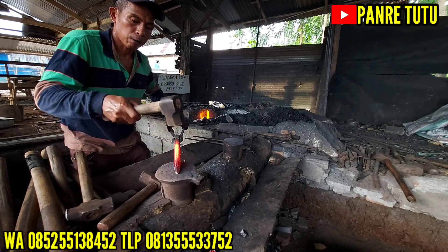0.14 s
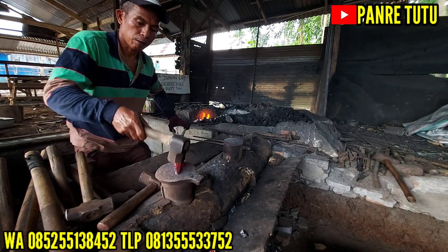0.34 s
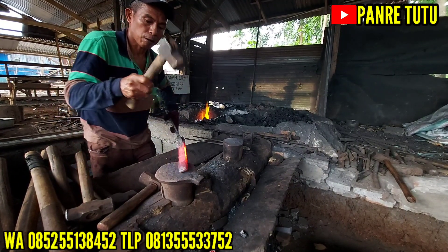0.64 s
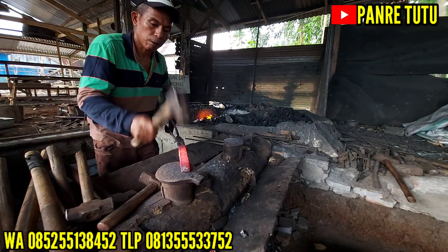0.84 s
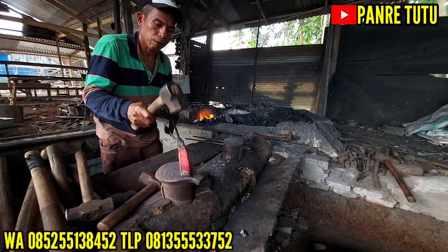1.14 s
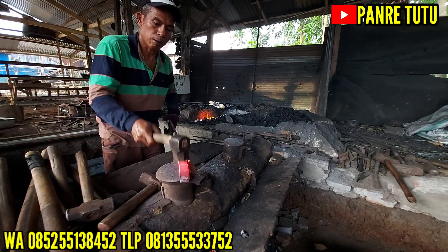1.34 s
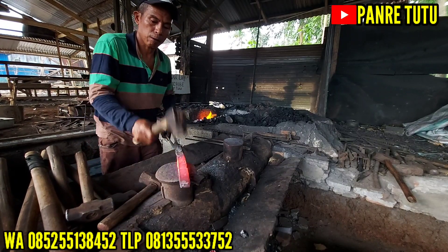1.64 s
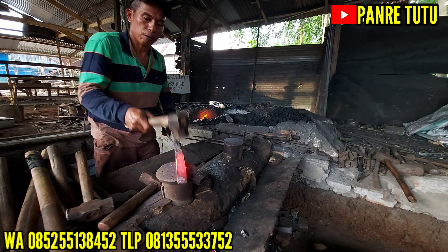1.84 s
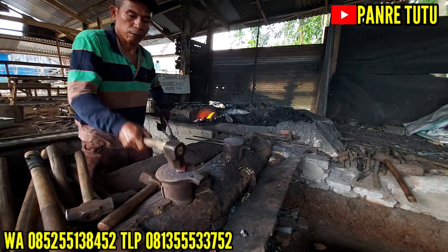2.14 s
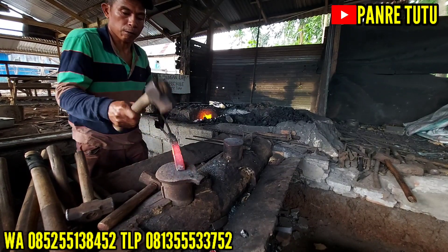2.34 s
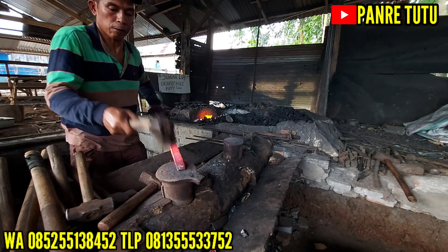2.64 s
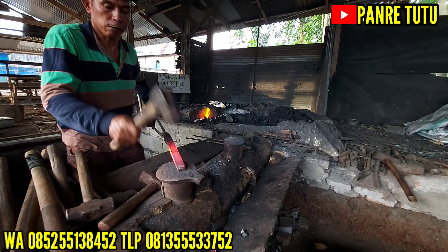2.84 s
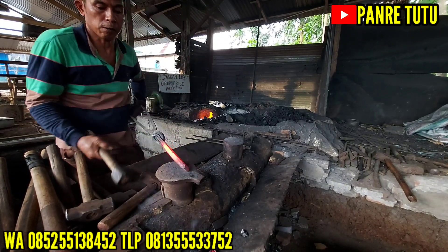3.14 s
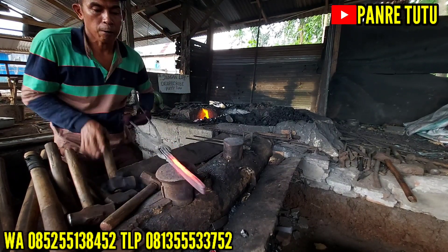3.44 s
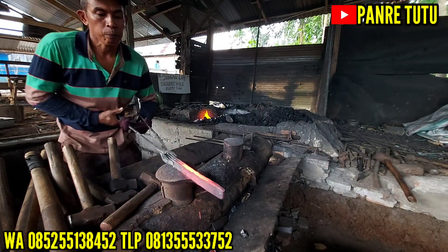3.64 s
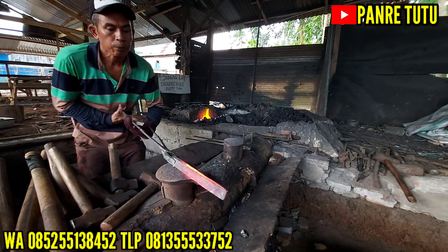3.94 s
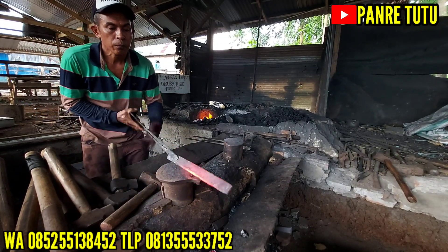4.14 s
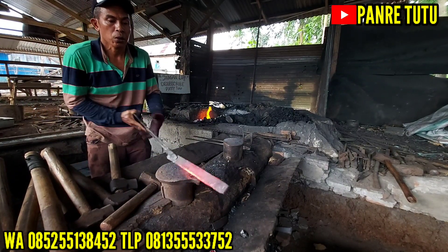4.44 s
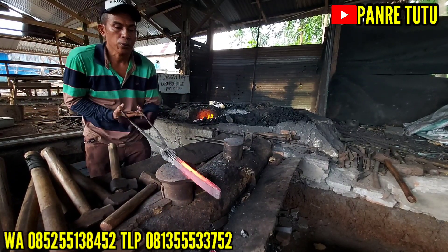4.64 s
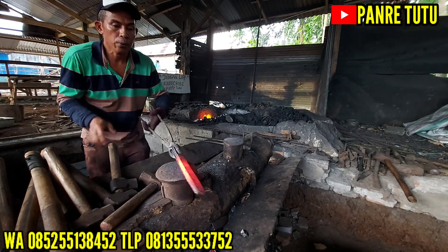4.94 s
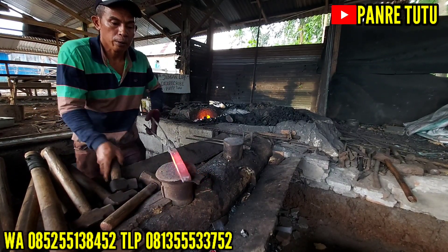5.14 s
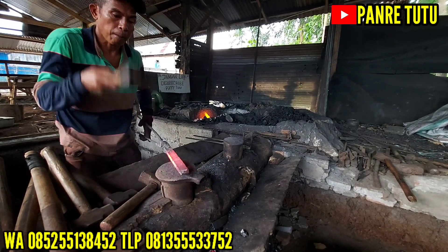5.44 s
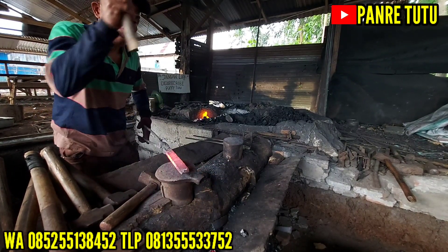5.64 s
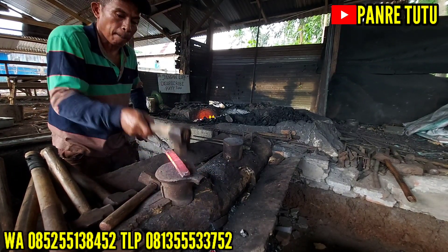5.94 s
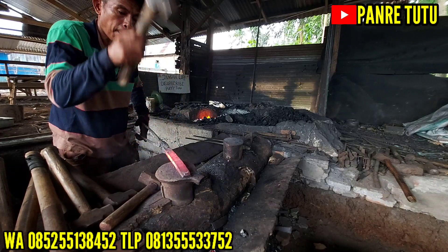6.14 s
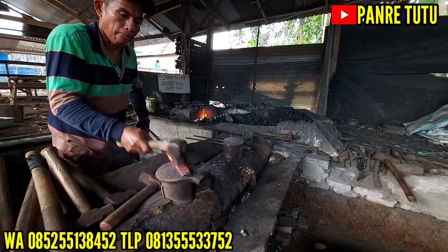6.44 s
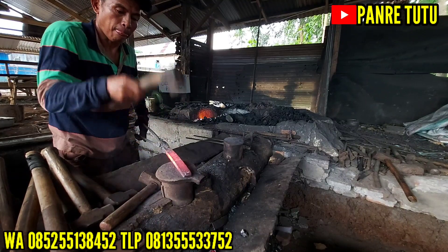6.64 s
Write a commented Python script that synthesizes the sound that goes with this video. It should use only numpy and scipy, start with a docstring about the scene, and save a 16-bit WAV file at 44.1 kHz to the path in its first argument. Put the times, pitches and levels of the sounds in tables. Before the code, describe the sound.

Close, single-channel sound in an open forge with a short, scattered roof reflection. Very faint air and low rumble lie underneath. At 0.4 s a light tap lands, then firm blows at 1.0, 1.4, 1.8, 2.2, 2.6 and 3.0 s: bright noisy steel cracks with a dull log thud and brief, damped ring. Faint hiss and tiny scale snaps sit between them, the hiss swelling near 2.0 s. At 3.3-3.45 s a dropped hammer clacks in a quick cluster among tools, followed by weaker knocks around 3.65 s and tiny settling touches until about 4.6 s. A low wavering blower hum grows. Around 5.1-5.4 s, a short sizzle swells, flakes snap and wooden handles scrape softly. The hum peaks near 5.5 s, then slowly sinks. Two harder, clearer-ringing blows strike at 5.96 and 6.54 s, their tails dying quickly before the end.

```python
"""Hammering hot iron in an open forge

A smith strikes a red-hot billet on a stake anvil set in a log, under a low roof. Each blow is a noisy
steel crack, a thud of log modes and a short ring of steel modes. Midway the hammer is dropped among other
tools, which knock and scrape, and a second one is taken up. Scale flakes snap and the iron hisses in
swelling noise, over the wavering tones of a blower, a low rumble and a faint wash of air."""
import sys
import numpy as np
from scipy import signal
from scipy.fft import rfft, irfft, next_fast_len
from scipy.io import wavfile

SR = 44100
rng = np.random.default_rng(int(sys.argv[2]) if len(sys.argv) > 2 else 0)


def digitize_waveform(pressure):
    """Quantize a signal to 16-bit integers and store it at the path in sys.argv[1].

    Rows of a 2-D input are taken as channels; values are limited to [-1, 1].
    """
    field = np.atleast_2d(pressure).T
    bounded = np.clip(field, -1, 1)
    quanta = np.round(bounded * 32767).astype(np.int16)
    wavfile.write(sys.argv[1], SR, quanta)


N = 299880
TIME = np.arange(N) / SR            # seconds into the scene
AGE = np.arange(int(0.6 * SR)) / SR  # seconds since the start of one hit
ATTACK = AGE < 0.08

# Bright crack of struck steel. Each row: frequency in Hz, relative level in dB per Hz.
CRACK_SPECTRUM = [(1200, -15), (2400, -3.5), (3400, -2), (4600, 0.5), (6800, -1.5), (8400, 2), (9900, -6.5),
                  (12000, 0), (15500, -11)]
# Colour of hot iron's hiss and of its snapping flakes. Each row: frequency in Hz, relative level in dB per Hz.
HISS_SPECTRUM = [(1470, -20), (2500, -16), (3520, -15.5), (5920, -5.5), (6900, -9.5), (8610, -5.5),
                 (9880, -17.5), (11500, -10.5), (15500, -14)]
# The wood's dull answer to a push or a rub. Each row: frequency in Hz, relative level in dB per Hz.
THUD_SPECTRUM = [(65, -3), (110, -7.5), (150, -1), (210, -3.5), (310, 2), (480, -1), (660, -5.5),
                 (770, -19.5), (1200, -27.5)]


def from_db(db):
    """Turns dB into an amplitude factor."""
    return 10 ** (np.asarray(db) / 20)


def rms_one(x):
    """Scales a sound to rms 1."""
    return x / np.sqrt(np.mean(x ** 2) + 1e-20)


def hit_one(x):
    """Scales a hit to rms 1 over its first 80 ms."""
    return x / np.sqrt(np.mean(x[ATTACK] ** 2) + 1e-20)


def at_hz(points, hz):
    """Reads a curve between its points, along a logarithmic frequency axis."""
    known_hz, values = np.transpose(points)
    return np.interp(np.log(hz), np.log(known_hz), values)


def add(track, s, sound):
    """Mixes a sound in at time s."""
    start = max(0, round(s * SR))
    track[start:start + len(sound)] += sound[:max(0, N - start)]


def band(x, low_hz, high_hz, order=2):
    """Band-pass filter."""
    sos = signal.butter(order, [low_hz, min(high_hz, 0.45 * SR)], "band", fs=SR, output="sos")
    return signal.sosfilt(sos, x)


def colour(x, spectrum):
    """Causal (minimum-phase) filter with the given spectrum, falling 20 dB per octave beyond its ends."""
    size = 2 * next_fast_len(len(x))
    hz = np.maximum(np.arange(size // 2 + 1) * SR / size, 1)
    octaves_below = np.maximum(np.log2(spectrum[0][0] / hz), 0)
    octaves_above = np.maximum(np.log2(hz / spectrum[-1][0]), 0)
    gain = from_db(at_hz(spectrum, hz) - 20 * (octaves_below + octaves_above))
    # folding the cepstrum onto positive time gives the minimum phase
    cepstrum = irfft(np.log(gain))
    cepstrum[1:size // 2] *= 2
    cepstrum[size // 2 + 1:] = 0
    return irfft(rfft(x, size) * np.exp(rfft(cepstrum)))[:len(x)]


def drift(rate):
    """Random wander of rms 1, with so many turning points per second."""
    knots = rng.standard_normal(2000)
    return rms_one(np.interp(TIME * rate, np.arange(len(knots)), knots))


def fade(t60):
    """Exponential decay that loses 60 dB in t60 seconds."""
    return from_db(-60 * AGE / t60)


def mode(hz, t60):
    """One damped resonance: a dying sine."""
    return np.sin(2 * np.pi * hz * AGE) * fade(t60)


def burst(t60):
    """Dense tiny contacts that die away."""
    return rng.standard_normal(len(AGE)) * fade(t60)


def forge_tail(roof_s=0.012, early_db=-8):
    """Nearby clutter scatters a little; the bulk returns from the roof and dies band by band. Energy 1."""
    # Ring time under the roof. Each row: frequency in Hz, t60 in seconds.
    roof_t60 = [(67, 0.42), (350, 0.31), (1700, 0.28), (5600, 0.24), (12700, .21)]
    edges = [30, 150, 800, 3500, 9000, 18000]  # Hz
    hz = np.arange(len(AGE) // 2 + 1) * SR / len(AGE)
    white = np.exp(2j * np.pi * rng.random(len(hz)))
    tail = np.zeros(len(AGE))
    for low, high in zip(edges, edges[1:]):
        slice_noise = irfft(white * (hz >= low) * (hz < high), len(AGE))
        tail += slice_noise * fade(at_hz(roof_t60, np.sqrt(low * high)))
    tail = tail * np.where(AGE < roof_s, from_db(early_db), 1)
    return tail / np.linalg.norm(tail)


def in_forge(x, wet_db):
    """A ringing sound together with its scattered reflections."""
    reflections = signal.fftconvolve(x, forge_tail())[:len(AGE)]
    return hit_one(hit_one(x) + from_db(wet_db) * hit_one(reflections))


def impact(force, spectrum, wet_db, echo_db):
    """A brief force, its near reflections and the scattered tail, all in the colour of the struck body."""
    # Near reflections from the floor and the smith. Each row: delay in seconds, relative gain.
    near_echoes = [(.0063, 0.31), (0.0125, 0.4)]
    direct = force / np.linalg.norm(force)
    near = sum(gain * np.roll(direct, round(delay * SR)) for delay, gain in near_echoes)
    tail = from_db(wet_db) * forge_tail()
    return hit_one(colour(direct + from_db(echo_db) * near + tail, spectrum))


def hammering():
    """Every blow: the scale cracks, the billet clanks, the steel rings, and log and ground take the weight."""
    # Hammer blows. Each row: start in seconds, force in dB, contact t60 in seconds, top of the crack in dB,
    # thump in Hz, thump level in dB, steel ring in dB, ring tilt to the treble in dB.
    blows = [(0.397, -8.5, 0.011, -6, 188, -28, -63, 8), (0.99, 1.5, 0.014, 0.5, 78, -36.5, -45.5, 3.5),
             (1.411, 0.1, 0.021, -2, 73, -40, -47, -0.5), (1.8112, -1, 0.024, -2, 76, -36, -61, 0),
             (2.219, 0, 0.0025, 1, 58, -31, -46.5, -8), (2.6219, 0.4, 0.0072, -4.5, 118, -30, -50.5, 1),
             (3.021, -0.6, 0.0093, 2, 84, -21.5, -46.5, 8.5), (5.963, 4, 0.017, 3, 60, -35, -29, -0.1),
             (6.541, 2.66, .0085, 1, 58, -25, -32.5, 2)]
    # Clank of the billet. Each row: frequency in Hz, relative level in dB per Hz.
    clank_spectrum = [(500, 9.5), (750, 13.5), (1100, 15), (1600, 12), (2500, 9), (3300, -24), (5000, -7.5),
                      (8000, -50)]
    out = np.zeros(N)
    for s, force_db, contact_s, top_db, thump_hz, thump_db, ring_db, tilt_db in blows:
        # the second hammer drives the log less and stirs up more tail
        second = s > 5.2
        # direct crack over its scattered tail: a bright, off-centre blow sounds drier
        snap_db = 3.5 + 0.2 * tilt_db - 4 * second

        # the parts of a blow grow with its force, each at its own pace
        crack_db = -35 + 1.1 * force_db
        clank_db = -36 + 2 * force_db
        thud_db = -22.5 + force_db - 2 * second

        # soft iron gives way, so the force takes a moment to peak
        force = burst(contact_s) * np.clip(8 * AGE / contact_s, 0, 1)
        spectrum = [(hz, db + top_db * (hz > 9500)) for hz, db in CRACK_SPECTRUM]
        crack = from_db(crack_db) * impact(force, spectrum, wet_db=-snap_db, echo_db=-13)
        clank = from_db(clank_db) * impact(burst(t60=0.0046), clank_spectrum, wet_db=6, echo_db=-10)

        # the middle cluster stands above its neighbours; a bright blow chokes the ring into clang
        cluster_db = [ring_db - tilt_db, ring_db + 2.5, ring_db + tilt_db]
        ring = steel_ring(cluster_db, clang_db=2 + 1.6 * tilt_db, snap_db=snap_db)
        wood = from_db(thud_db) * log_thud() + from_db(thump_db) * ground_thump(thump_hz)
        add(out, s, crack + clank + ring + wood)
    return out


def steel_ring(levels_db, clang_db, snap_db, spread_db=-0.84):
    """Three clusters of free steel modes, each with a quickly damped clang at its own level."""
    # Steel modes of hammer and anvil. Each row: frequency in Hz, relative level in dB, t60 in seconds.
    steel_modes = [(2688, -6, 0.36), (2766, -10, 0.25), (2964, -18.5, 0.17), (4160, -2, .18),
                   (4360, 4, 0.12), (4313, -5.5, 0.18), (4745, -6.5, 0.21), (8075, -22.5, 0.12),
                   (9000, -13, 0.076), (8470, 1, 0.14), (9107, -16.5, .2)]
    # Borders between the three clusters, in Hz.
    splits_hz = [3500, 6000]
    # Damped clang around each cluster. Each row: frequency in Hz, bandwidth in Hz.
    clang_modes = [(2760, 140), (4420, 240), (8420, 420)]
    clusters = np.zeros((3, len(AGE)))
    for hz, db, t60 in steel_modes:
        varied_db = db + spread_db * rng.standard_normal()
        clusters[np.searchsorted(splits_hz, hz)] += from_db(varied_db) * mode(hz, t60)
    out = np.zeros(len(AGE))
    for db, cluster, (hz, width_hz) in zip(levels_db, clusters, clang_modes):
        clang_t60 = np.log(1000) / (np.pi * width_hz)
        clang = in_forge(mode(hz, clang_t60), wet_db=2.5 - snap_db)
        free_ring = in_forge(cluster, wet_db=-10)
        out += from_db(db) * hit_one(free_ring + from_db(clang_db) * clang)
    return out


def log_thud(ring_db=-6, ring_t60=0.25, spread_db=0.5, swell_s=0.0047):
    """The log takes one short push and its modes ring on, a little differently at each blow."""
    # Modes of the log with the anvil in it. Each row: frequency in Hz, relative level in dB.
    log_modes = [(149, 5), (226, -3.5), (262, -0.5), (318, 5.5), (342, 2.5), (378, -4.5), (409, -33.5),
                 (456, 2.5), (474, 5), (521, -16), (556, -9.5), (591, 0.5), (612, -17), (665, 2.5),
                 (799, -39), (816, -25), (939, -13), (1105, -5.5), (1128, -18.5), (1147, -12.5),
                 (1346, -42.5), (1370, -21)]
    push = impact(np.where(AGE == 0, -1, 0), THUD_SPECTRUM, wet_db=-4, echo_db=2)
    rings = np.zeros(len(AGE))
    for hz, db in log_modes:
        varied_db = db + spread_db * rng.standard_normal()
        rings += from_db(varied_db) * rng.choice([-1, 1]) * mode(hz, ring_t60)
    swelling_rings = rings * (1 - np.exp(-AGE / swell_s))
    return hit_one(push + from_db(ring_db) * hit_one(swelling_rings))


def ground_thump(hz, cycles=4.7):
    """The log bounces on the earth floor: a low mode that loses 60 dB within a few cycles."""
    bounce = band(mode(hz, cycles / hz), 42, 490)
    return in_forge(band(bounce, 36, 970), wet_db=-15.5)


def tool_clatter(count=5, touch_hz=900, touch_spread=0.15, tool_db=-15):
    """Hammer heads and wooden handles tumble against the log, then settle."""
    # Tools knocking on the log and on each other.
    # Each row: start in seconds, log thud in dB, tool level in dB, tool note in Hz.
    tool_knocks = [(.001, -40, -47, 647), (3.295, -19.5, -34.5, 669), (3.307, -25, -29.5, 1246),
                   (3.3635, -24.5, -33.5, 944), (3.384, -36, -39.5, 810), (3.397, -35, -40, 1330),
                   (3.433, -37.5, -42, 1014), (3.614, -31.5, -46.5, 597), (3.623, -40, -53, 1023),
                   (3.666, -40.5, -50, 630), (3.746, -65, -53, 964), (3.846, -66, -66, 966),
                   (3.875, -49, -63, 595), (3.989, -57, -72.5, 840), (4.102, -70, -47.5, 813),
                   (4.123, -44.5, -55, 859), (4.589, -68, -80, 593)]
    out = np.zeros(N)
    for s, *contact in tool_knocks:
        add(out, s, knock(*contact))

    # the dropped hammer rocks itself to rest with light random touches, ever weaker
    settle_start_s, settle_length_s = 3.64, 0.52
    settle_db, settle_db_per_s = -52, -8.5
    for k, (late, pitch) in enumerate(rng.random((count, 2))):
        age = settle_length_s * (k + late) / count
        db = settle_db + settle_db_per_s * age
        note_hz = touch_hz * (1 + touch_spread * (2 * pitch - 1))
        add(out, settle_start_s + age, knock(db, db + tool_db, note_hz))
    return out


def knock(thud_db, tool_db, note_hz, note_t60=0.055, overtone=2.25, overtone_db=-13):
    """A tool meets the log and rings briefly with its own note; the firmer the knock, the more it clacks."""
    # Clack of tool on wood. Each row: frequency in Hz, relative level in dB per Hz.
    clack_spectrum = [(200, -9), (400, -1.5), (850, 3), (1400, 1.5), (2200, -6), (2900, -11), (4000, -17),
                      (8000, -30.5)]
    firmness_db = tool_db + 36  # 0 for a firm knock
    clack_db = -36.5 + 1.71 * firmness_db
    tick_db = -65 + 0.53 * firmness_db
    clack = from_db(clack_db) * impact(rattle(t60=0.075), clack_spectrum, wet_db=3, echo_db=0.5)
    tick = from_db(tick_db) * impact(burst(t60=0.02), CRACK_SPECTRUM, wet_db=2.5, echo_db=-11.5)
    upper = from_db(overtone_db) * mode(overtone * note_hz, note_t60)
    note = in_forge(mode(note_hz, note_t60) + upper, wet_db=-7.5)
    thud = log_thud() + from_db(-8.5) * ground_thump(hz=155)
    return from_db(thud_db) * thud + clack + tick + from_db(tool_db) * note


def rattle(t60, per_s=220, first=2.3):
    """One firm contact followed by separate, dying chatters."""
    chatter = (rng.random(len(AGE)) < per_s / SR) * burst(t60)
    return chatter + first * (AGE == 0)


def scrapes(swell_s=0.039, t60=0.09, note_db=-3):
    """Wood rubs on wood: friction swells softly and stirs the handle's note."""
    # Handles sliding over each other as one is picked up. Each row: start in seconds, level in dB, note in Hz.
    rubs = [(5.173, -52, 417), (5.24, -40.5, 790), (5.314, -46, 705)]
    out = np.zeros(N)
    for s, db, hz in rubs:
        friction = burst(t60) * np.clip(AGE / swell_s, 0, 1)
        note = hit_one(band(friction, 0.61 * hz, 0.99 * hz))
        rub = hit_one(colour(friction, THUD_SPECTRUM))
        add(out, s, from_db(db) * in_forge(rub + from_db(note_db) * note, wet_db=-8))
    return out


def flakes():
    """Flakes of scale snap off the iron: small bright bursts in the colour of the hiss."""
    # Snapping flakes. Each row: start in seconds, level in dB.
    snaps = [(0.841, -63), (1.561, -64.5), (5.113, -71), (5.139, -57.5), (5.756, -78), (6.216, -74)]
    out = np.zeros(N)
    for s, db in snaps:
        add(out, s, from_db(db) * impact(burst(t60=0.032), HISS_SPECTRUM, wet_db=-1, echo_db=-5))
    return out


def sizzle(spits_per_s=500, spit_db=-6, flutter_db=1.55):
    """Smooth hiss with tiny spits in it; each spell swells and sinks in one arch."""
    # Spells of hiss while the hot iron lies against the anvil.
    # Each row: start in seconds, length in seconds, level in dB.
    spells = [(0.587, 0.47, -72.5), (0.845, 0.95, -62.5), (1.78, 0.47, -55.5), (4.92, 0.2, -64.5),
              (5.089, .31, -46.5), (5.38, 0.8, -66.5)]
    steepness, smoothing_s, rest_db = 1.2, 0.02, -88.5
    level = np.full(N, from_db(rest_db))
    for s, length_s, db in spells:
        progress = np.clip((TIME - s) / length_s, 0, 1)
        level += from_db(db) * np.abs(np.sin(np.pi * progress)) ** steepness
    keep = np.exp(-1 / (smoothing_s * SR))
    level = signal.lfilter([1 - keep], [1, -keep], level)
    spits = (rng.random(N) < spits_per_s / SR) * rng.standard_normal(N)
    hiss = rng.standard_normal(N) + from_db(spit_db) * rms_one(spits)
    flutter = from_db(flutter_db * drift(60))
    return level * flutter * rms_one(colour(hiss, HISS_SPECTRUM))


def blower(waver=0.21, throb_db=4.5):
    """Wavering motor tones over a low rush of air; both rise as the blower runs up once and coasts down."""
    # Blower tones. Each row: frequency in Hz, relative level in dB.
    motor_tones = [(107.7, -12), (144.5, 1), (344.5, -27), (457.6, -26.5)]
    # Low rumble of moving air. Each row: frequency in Hz, relative level in dB per Hz.
    rumble_spectrum = [(25, -29), (45, -6), (68, 2), (110, -1), (145, 1.5), (200, -6.5), (300, -13),
                       (450, -22.5), (600, -28), (800, -40.5), (1200, -39)]
    idle_db, peak_db, peak_s = -69, -42, 5.47
    run_up_db_per_s, coast_db_per_s = 16, 7
    draught_db, rush_db = -56.5, -8  # steady draught of the forge; air the blower adds, against its hum

    run_up_db = run_up_db_per_s * (peak_s - TIME)
    coast_db = coast_db_per_s * (TIME - peak_s)
    below_peak_db = np.maximum(run_up_db, coast_db)
    effort = np.hypot(from_db(idle_db), from_db(peak_db - below_peak_db))

    hum = np.zeros(N)
    for hz, db in motor_tones:
        throb = from_db(db + throb_db * drift(9))
        hum += throb * np.sin(2 * np.pi * hz * TIME + waver * drift(3.1))  # waver in radians
    rumble = colour(rng.standard_normal(N), rumble_spectrum)
    rumble_level = np.hypot(from_db(draught_db), from_db(rush_db) * effort)
    return effort * rms_one(hum) + rumble_level * rms_one(rumble)


def background_air(level_db=-75.5, flutter_db=0.67):
    """Faint coloured noise whose level flutters slightly."""
    # Colour of the background air. Each row: frequency in Hz, relative level in dB per Hz.
    air_spectrum = [(700, -11.5), (1000, -9), (1450, -2.5), (2000, -11), (3000, -20.5), (4500, -9.5),
                    (7000, -15.5), (8200, -0.5), (9600, -16), (11500, -9), (15500, -20)]
    noise = rms_one(colour(rng.standard_normal(N), air_spectrum))
    return from_db(level_db + flutter_db * drift(9.8)) * noise


def scene():
    """Sums all layers into one channel."""
    work = hammering() + tool_clatter() + scrapes() + flakes() + sizzle()
    return (work + blower() + background_air())[None]


def record(dry, top=0.62, cutoff_hz=15600):
    """The highest peaks are rounded, then a steep low-pass cuts the top treble."""
    rounded = top * np.tanh(dry / top)
    return signal.sosfilt(signal.ellip(10, 0.2, 70, cutoff_hz, fs=SR, output="sos"), rounded)


dry = scene()
out = record(dry)
digitize_waveform(out)
```